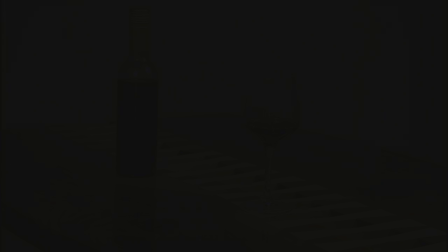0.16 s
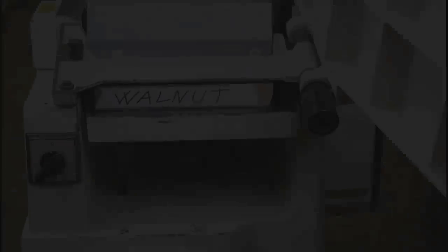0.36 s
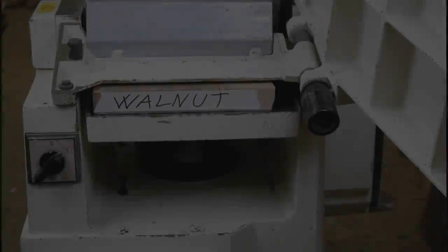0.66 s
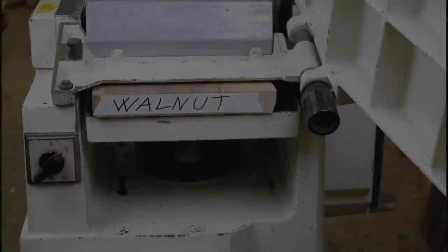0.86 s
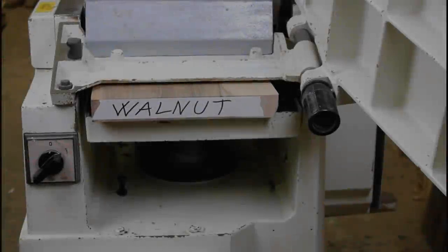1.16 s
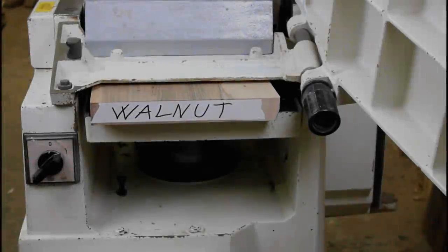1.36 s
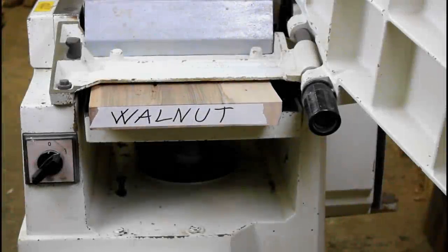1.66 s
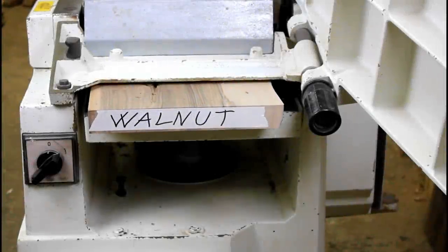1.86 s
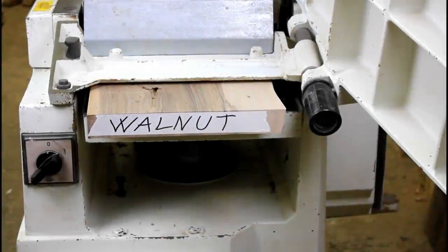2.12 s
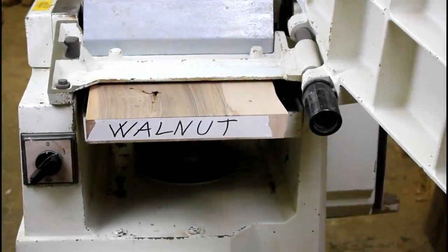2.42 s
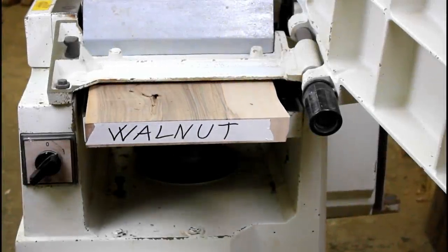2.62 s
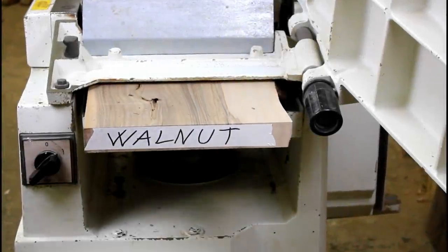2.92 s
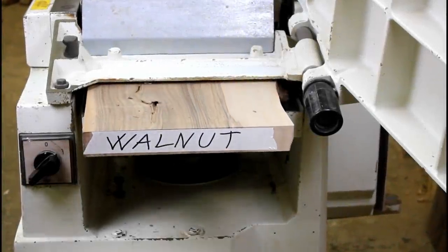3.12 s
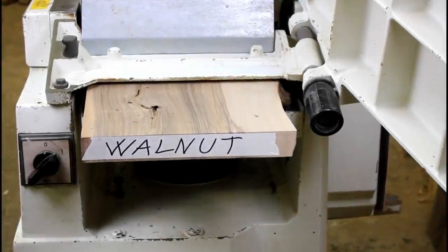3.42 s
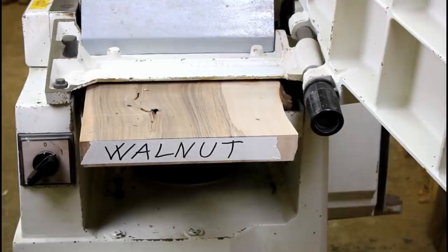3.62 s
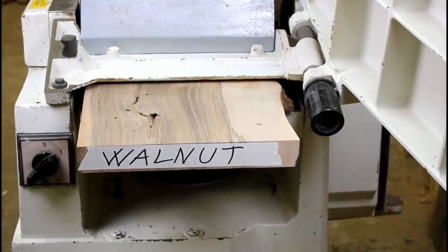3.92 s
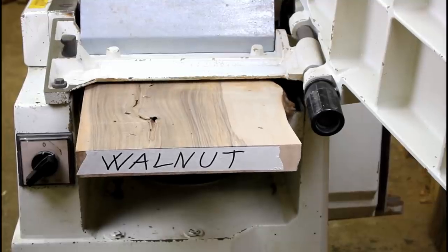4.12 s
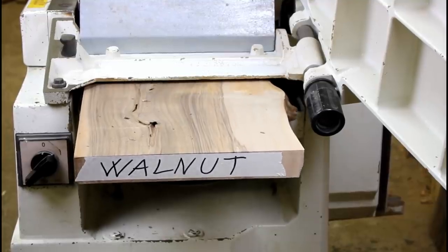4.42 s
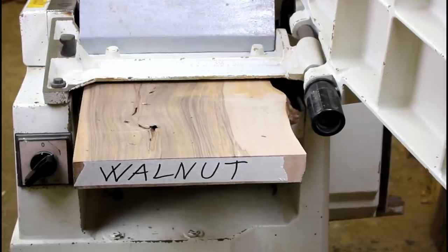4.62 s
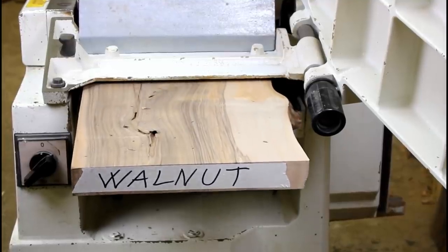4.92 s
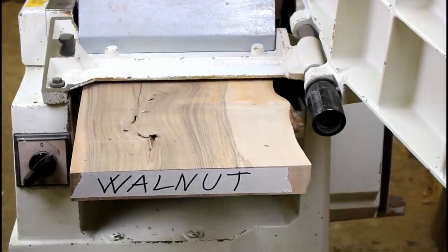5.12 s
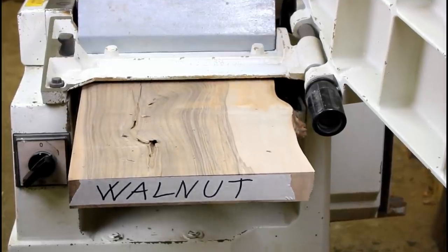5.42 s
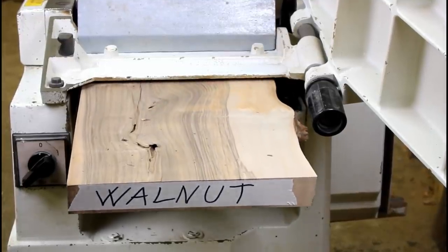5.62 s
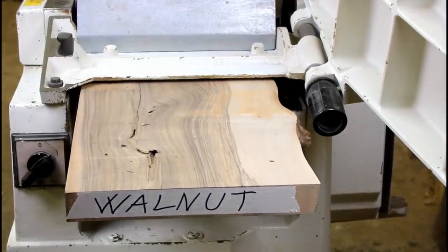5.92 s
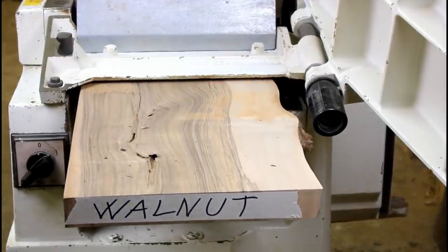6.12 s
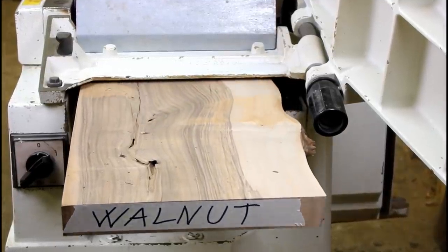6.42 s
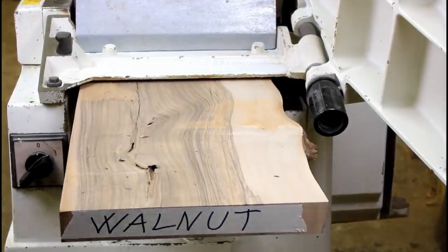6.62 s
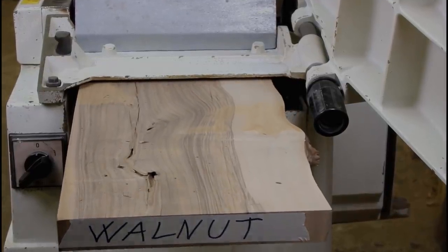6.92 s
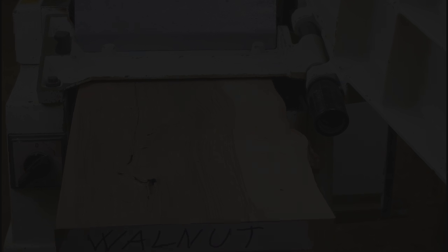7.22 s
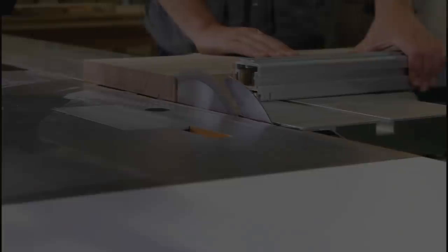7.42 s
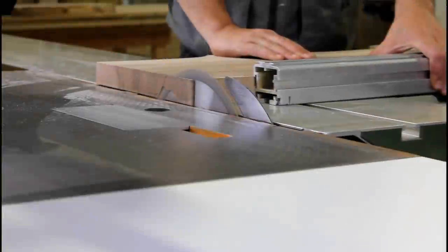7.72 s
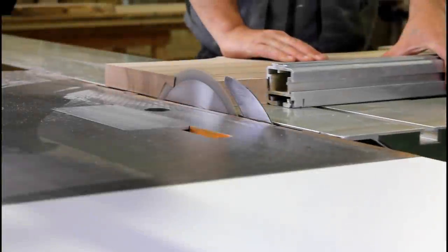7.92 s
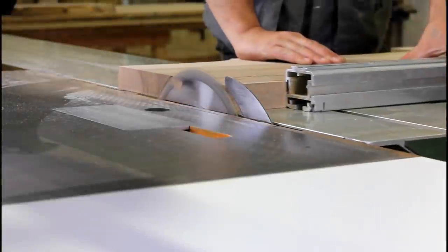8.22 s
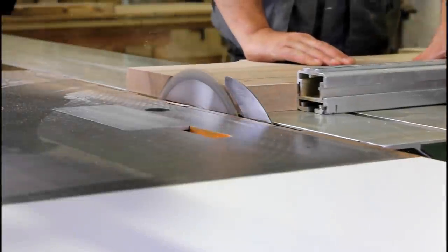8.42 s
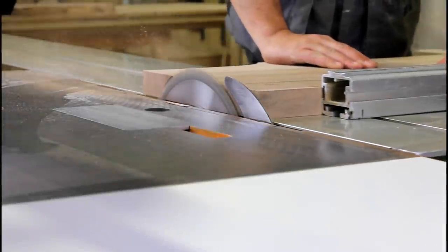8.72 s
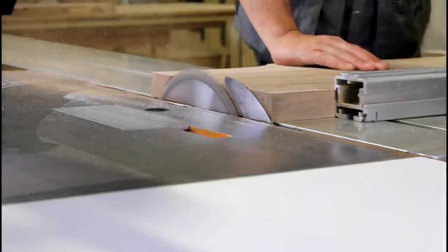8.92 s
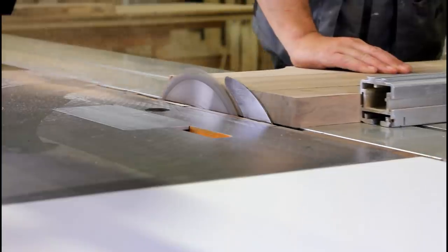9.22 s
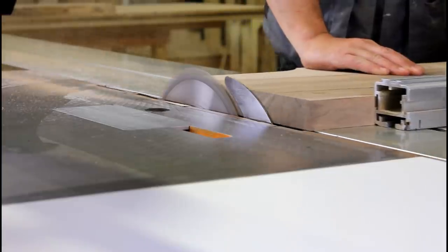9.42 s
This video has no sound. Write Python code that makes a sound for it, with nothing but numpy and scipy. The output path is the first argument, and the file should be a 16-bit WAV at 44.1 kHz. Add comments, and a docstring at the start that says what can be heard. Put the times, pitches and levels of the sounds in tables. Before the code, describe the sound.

In a dry-sounding woodworking shop, heard in mono, a planer builds up as it cuts a board: a shifting, many-toned whine with a throbbing rasp, hissing chips and a steady machine roar. It fades away completely. Right after, a table saw rips a board for the last two seconds or so, with two tiny bright scrapes, a high metallic ring from the blade and an even cutting hiss.

```python
"""A wood shop on one microphone, dry, the same in both channels.
First a thickness planer shaves a wide board: three knives on one cutterhead whine, rasp and spit chips
over the roar of the machine. It fades out to silence a little after seven seconds.
Then a table saw fades in: its teeth sing as they enter the board, and the cut swells to an even hiss."""
import sys
import numpy as np
from scipy import signal
from scipy.io import wavfile
from scipy.ndimage import uniform_filter1d

SR = 44100
rng = np.random.default_rng(int(sys.argv[2]) if len(sys.argv) > 2 else 0)


def bounce(signal):
    """Save signal as a 16-bit WAV file at the path given by the first command-line argument."""
    frames = np.transpose(np.atleast_2d(signal))
    limited = np.clip(frames, -1, 1)
    pcm = np.round(limited * 32767).astype(np.int16)
    wavfile.write(sys.argv[1], SR, pcm)


N = 421596
HOP = 256  # samples between updates of slow levels
CHANGE_S = 7.257  # the silence between planer and saw
KNIVES, TEETH = 3, 96

# planer balance: t/s, then relative level/dB of whine, chips, rasp, body drone
PLANER_LEVELS = [(0.0, -54.5, -63, -60, -53), (0.1, -51, -58.5, -55.5, -49.5), (0.55, -48, -57.5, -51, -48),
                 (0.9, -50, -57, -53, -48.5), (1.1, -45.5, -53.5, -50, -45.5), (1.4, -44, -53, -51, -44.5),
                 (1.46, -44, -52.5, -53, -46), (1.52, -41.5, -54, -48, -47),
                 (1.68, -40, -55.5, -48.5, -48.5), (1.8, -42.5, -58, -51.5, -48),
                 (2.1, -40, -56, -49.5, -45.5), (2.26, -40.5, -54, -49.5, -45.5),
                 (2.57, -37, -49, -47.5, -43.5), (2.89, -37.5, -52.5, -48, -45), (3.05, -34, -47, -46, -43),
                 (3.58, -34, -48, -44, -41), (4.0, -35, -50.5, -45, -40), (4.5, -37, -54.5, -47, -44.5),
                 (4.73, -37.5, -47, -47, -42.5), (4.97, -35.5, -46, -44.5, -43.5),
                 (5.45, -36.5, -46.5, -45.5, -39), (6.0, -36, -49, -42.5, -43), (6.3, -39, -50, -47, -45),
                 (6.6, -38, -48.5, -45, -46), (7.05, -38, -49, -41, -46)]
# saw balance: t/s, then relative level/dB of rumble, cutting hiss, sizzle, plate ring
SAW_LEVELS = [(7.3, -48, -41, -55, -49.5), (7.45, -49, -49, -55, -46), (7.57, -47.5, -38, -52, -54),
              (7.705, -41.5, -34, -50, -44.5), (7.725, -48, -39.5, -51, -51.5),
              (7.9, -43.5, -37.5, -51, -46), (8.1, -43, -37.5, -50, -42.5),
              (8.25, -41.5, -37.5, -47, -38.5), (8.4, -40.5, -38.5, -46, -37.5),
              (8.52, -40.5, -35.5, -42.5, -37.5), (8.6, -40.5, -39, -45.5, -36),
              (8.82, -42.5, -40.5, -45, -34), (9.07, -42, -38.5, -46.5, -37.5),
              (9.16, -41, -36.5, -47, -39.5), (9.28, -40.5, -36.5, -46.5, -37.5),
              (9.45, -43, -35, -48.5, -40.5), (9.56, -40, -35.5, -46, -38)]


def planer():
    """Knives strike the board on every turn; the cutterhead slows as the cut widens."""
    # cutterhead speed: t/s, turn rate/Hz
    speed = [(0.0, 72.4), (0.38, 71.96), (1.56, 71.72), (1.96, 71.2), (2.93, 71.67), (4.39, 71.04),
             (4.67, 71.6), (4.97, 70.8), (5.37, 70.96), (5.94, 70.44), (6.26, 70.5), (7.2, 70.74)]
    at, t, hops = span(0, CHANGE_S)
    hz = curves(speed, t)[0]
    turns = np.cumsum(hz) / SR
    knife = (KNIVES * turns).astype(int)
    knife_db = np.array([0, -8, -10])  # one knife stands proud of the others
    blows = amp(knife_db[knife % KNIVES]) * np.exp(-(KNIVES * turns % 1) / 2.3)
    belt = 1 + .07 * np.cos(2 * np.pi * 17.5 * t)  # the drive belt makes rasp and chips throb
    whine = knife_whine(t, hops, turns, hz.mean())
    rasp = knife_rasp(t, hops, turns, hz.mean(), blows)
    return at, whine + belt * (rasp + chip_spray(t, knife, blows)) + planer_roar(t)


def knife_whine(t, hops, turns, mean_hz):
    """Repeating blows make a stack of orders whose balance shifts as the board slides out."""
    # orders with the board's free end short, half out and long: multiple, relative level/dB
    short_board = [(1, -33), (2, -29.5), (3, -21), (4, -17), (5, -19.5), (6, -8.5), (7, -24), (8, -23),
                   (9, -8.5), (10, -15.5), (11, -14), (12, -6), (13, -25), (14, -10.5), (15, 0), (16, -19),
                   (17, -2.5), (18, -8), (19, -8), (20, -10), (21, -9), (22, -14), (23, -5), (24, -4),
                   (25, -15), (26, -9), (27, -5.5), (28, -13), (29, -12.5), (30, -5.5), (31, -29),
                   (32, -19), (33, -11), (34, -7), (35, -23.5), (36, -11), (37, -6), (38, -8), (39, -33),
                   (40, -15), (41, -10), (42, -14), (43, -12), (44, -5), (45, -15.5), (46, -10.5),
                   (47, -31), (48, -24)]
    half_board = [(1, -32.5), (2, -29.5), (3, -20), (4, -18.5), (5, -17), (6, -8.5), (7, -27.5), (8, -16),
                  (9, -10), (10, -23), (11, -20.5), (12, -12), (13, -11), (14, -13), (15, 0), (16, -18.5),
                  (17, -12.5), (18, -3), (19, -20), (20, -12.5), (21, -12), (22, -19.5), (23, -1), (24, -4),
                  (25, -16.5), (26, -23), (27, -12.5), (28, -13), (29, -14.5), (30, -12), (31, -18),
                  (32, -19.5), (33, -17), (34, -37), (35, -13.5), (36, -14), (37, -39), (38, -19),
                  (39, -18), (40, -17.5), (41, -16.5), (42, -24), (43, -16.5), (44, -24), (45, -23.5),
                  (46, -80), (47, -20.5), (48, -21)]
    long_board = [(1, -35.5), (2, -30), (3, -12), (4, -20), (5, -12.5), (6, -10.5), (7, -31), (8, -17.5),
                  (9, -21), (10, -23), (11, -16.5), (12, -3), (13, -17), (14, -7), (15, -5), (16, -24),
                  (17, -13), (18, -6), (19, -16), (20, -10.5), (21, 0), (22, -15), (23, -4), (24, -8),
                  (25, -15), (26, -9.5), (27, -20), (28, -15), (29, -15), (30, -10), (31, -26), (32, -12),
                  (33, -14), (34, -17), (35, -14), (36, -14.5), (37, -33), (38, -18), (39, -19.5),
                  (40, -26), (41, -18.5), (42, -13), (43, -26), (44, -19.5), (45, -12.5), (46, -15),
                  (47, -31), (48, -10.5)]
    # loudest orders at rest: multiple, level/dB over the whine
    loud_orders = [(3, -21.5), (12, -13.0), (15, -5.5), (18, -13), (21, -16.0), (23, -11), (24, -15.5)]
    # they swell as the grain changes: middle t/s, length/s, multiple, peak/dB over the whine
    grain_swells = [(0.0, 0.8, 12, 2), (0.27, 1.86, 15, 3.5), (0.3, 1.2, 3, -21), (0.378, 0.42, 24, -1),
                    (0.54, 1.1, 21, -2.5), (0.81, 1.66, 12, -6), (0.92, 0.32, 15, 3.5),
                    (0.96, 1.8, 18, -7.5), (1.41, 1.1, 24, 1), (1.57, 1.44, 23, -0.5), (2.06, 0.89, 3, -17),
                    (2.07, 0.67, 15, -4.5), (2.08, 1.1, 21, -4.5), (2.434, 0.15, 12, -13),
                    (2.84, 1.16, 23, -3), (2.847, 0.47, 18, -7), (2.998, 0.6, 15, -13),
                    (3.993, 2.1, 24, -4.5), (4.017, 1.74, 18, -2.5), (4.13, 0.86, 15, 0.0),
                    (4.304, 0.86, 23, 2), (4.39, 0.23, 21, -9), (4.5, 0.6, 3, -24.5), (4.7, 0.2, 12, -8),
                    (4.85, 0.25, 15, -9), (5.33, 1.1, 24, -12), (5.39, 0.32, 18, -4), (5.4, 1.2, 23, -9.0),
                    (5.58, 1.09, 3, -17.5), (5.79, 1.4, 12, -7), (6.166, 1.6, 21, 0),
                    (6.408, 0.52, 23, -5.5), (6.43, 0.17, 15, -3), (6.65, 0.35, 24, -22),
                    (6.74, 1.15, 3, -13.5), (6.846, 0.25, 15, -27), (6.98, 0.78, 12, -12),
                    (7.155, 0.16, 15, -6), (7.15, 0.85, 18, -10)]
    whine_db, _, _, body_db = curves(PLANER_LEVELS, t)
    loud_db = swollen(loud_orders, grain_swells, hops)
    stages_s = [.9, 2.6, 4.3, 5.7]
    short = np.interp(hops, stages_s, [1, 0, 0, 0])
    long = np.interp(hops, stages_s, [0, 0, 0, 1])
    k = np.transpose(short_board)[0]
    order_db = board_resonance(k * mean_hz, hops)
    for stage, share in (short_board, short), (half_board, 1 - short - long), (long_board, long):
        order_db += np.outer(np.transpose(stage)[1], share)
    quiet = ~np.isin(k, list(loud_db))
    low, upper = quiet & (k <= 9), quiet & (k > 9)  # the machine body drones on the low orders
    drone = amp(body_db + 6) * orders(turns, k[low], order_db[low], wander=.34, seconds=.26)
    whine = amp(whine_db + 1) * orders(turns, k[upper], order_db[upper], wander=.75, seconds=.2)
    loud = amp(whine_db) * orders(turns, list(loud_db), list(loud_db.values()), wander=.18, seconds=.05)
    return drone + whine + loud


def knife_rasp(t, hops, turns, mean_hz, blows):
    """Nicks in the knives repeat the same rasp at every turn."""
    # outline of the high orders: f/Hz, relative level/dB
    outline = [(3400, -18), (4200, -22.5), (5000, -23.5), (5800, -27), (7000, -32), (8500, -37.5),
               (11000, -37.5), (13600, -47)]
    k = np.arange(49, 190)
    order_db = spectrum_at(outline, k * mean_hz) + 2 * rng.standard_normal(len(k))
    order_db += 3.25 * (k % KNIVES == 0)  # orders at the knife rate stand out
    order_db = order_db[:, None] + board_resonance(k * mean_hz, hops)
    rasp = orders(turns, k, order_db, wander=1, seconds=.22)
    rasp_db = curves(PLANER_LEVELS, t)[2]
    return amp(rasp_db + 7) * unit_rms(.86 + blows) * rasp


def board_resonance(hz, hops):
    """Resonances of board and table pass as the board slides out: lift in dB by frequency and hop."""
    # resonances: middle t/s, length/s, f/Hz, width/Hz, lift/dB
    resonances = [(0.52, 0.58, 4260, 150, 6), (0.55, 0.7, 5450, 400, 6), (0.84, 0.68, 3170, 220, 3.5),
                  (1.003, 0.85, 6500, 400, 12), (1.22, 0.41, 4950, 220, 8), (1.493, 0.44, 1910, 500, 6),
                  (1.862, 0.55, 2310, 220, 12), (2.148, 1, 3198, 220, 20.5), (2.15, 0.44, 4400, 250, 7),
                  (2.21, 1.6, 1860, 220, 6), (2.738, 0.72, 3970, 220, 11), (3.312, 0.62, 2630, 220, 1),
                  (3.4, 1.2, 5606, 220, 6), (3.59, 0.78, 2230, 219, 2.5), (3.61, 0.53, 3830, 220, 5),
                  (4.31, 0.36, 5480, 220, 12.5), (4.46, 1, 3080, 220, 6), (4.718, 0.22, 3094, 300, 12),
                  (4.75, 0.24, 2000, 300, 9.5), (5.0, 0.29, 5100, 250, 10), (5.34, 0.21, 3730, 229, 8),
                  (5.35, 0.4, 5680, 250, 9), (5.768, 0.86, 5560, 220, 11), (5.845, 0.56, 2620, 220, 11.5),
                  (5.86, 1.3, 2930, 220, 4), (5.877, 0.31, 2150, 220, 5), (6.138, 0.79, 5150, 219, 12),
                  (6.28, 1.4, 3932, 220, 3), (6.553, 0.5, 6550, 250, 9), (6.897, 0.69, 2100, 200, 6),
                  (6.95, 0.75, 2750, 200, 11.5)]
    return sum(db * np.outer(bell(hz, f, width), bell(hops, middle, length))
               for middle, length, f, width, db in resonances)


def chip_spray(t, knife, blows):
    """Chips burst off each knife, every burst with its own size."""
    # chip hiss: f/Hz, relative level/dB
    spectrum = [(1470, -62), (2500, -14), (3100, -7), (4240, -10), (5590, -8.5), (6030, -9.5),
                (13400, -11.5), (15600, -15)]
    chips_db = curves(PLANER_LEVELS, t)[1]
    sizes = amp(2 * rng.standard_normal(knife[-1] + 1))
    bursts = unit_rms(.44 + blows * sizes[knife])
    return amp(chips_db + 5) * bursts * noise(spectrum, len(t), patchy_db=1)


def table_saw():
    """A toothed blade cuts the board and slowly recovers speed."""
    # teeth passing the wood: t/s, f/Hz
    tooth_rate = [(7.25, 3612), (7.6, 3605), (7.9, 3618), (8.2, 3626), (8.55, 3631), (8.8, 3643),
                  (9.1, 3641), (9.56, 3647)]
    at, t, hops = span(CHANGE_S, N / SR)
    turns = np.cumsum(curves(tooth_rate, t)[0]) / SR / TEETH
    blade = tooth_song(hops, turns) + plate_ring(t, turns)
    return at, blade + cutting_hiss(t, turns) + blade_scrapes(t) + saw_rumble(t, turns)


def tooth_song(hops, turns):
    """The teeth pass the wood as a tone; alternate bevels add half multiples."""
    # singing shaft orders at rest: multiple, level/dB
    singing_orders = [(27, -71), (48, -57.5), (96, -54), (192, -56), (288, -57), (384, -65.0)]
    # they squeal by fits: middle t/s, length/s, multiple, peak/dB
    squeals = [(7.418, 0.08, 384, -39.5), (7.42, 0.15, 96, -46), (7.502, 0.05, 192, -48.5),
               (7.529, 0.09, 288, -45), (7.532, 0.08, 384, -40), (7.639, 0.17, 48, -52.0),
               (7.643, 0.3, 96, -37.5), (7.661, 0.026, 288, -48), (7.702, 0.08, 384, -45.0),
               (7.716, 0.05, 192, -43), (7.72, 0.03, 384, -38.0), (7.742, 0.1, 288, -56.0),
               (7.825, 0.035, 96, -43.5), (7.823, 0.021, 192, -41), (7.991, 0.51, 192, -43),
               (8.002, 0.31, 384, -50), (8.026, 0.17, 96, -36.5), (8.099, 0.66, 288, -50.5),
               (8.1, 0.068, 288, -36.5), (8.14, 0.09, 384, -45.0), (8.234, 0.74, 48, -57),
               (8.266, 0.21, 96, -36.5), (8.395, 0.04, 96, -39.5), (8.466, 0.38, 27, -46.5),
               (8.591, 0.2, 192, -51.0), (8.663, 0.9, 384, -55.5), (8.744, 0.09, 96, -48.5),
               (8.754, 0.04, 192, -53), (8.81, 0.13, 27, -47), (8.894, 0.07, 96, -48),
               (8.901, 0.1, 192, -47.0), (8.944, 0.08, 288, -53), (9.065, 0.2, 96, -45),
               (9.197, 0.19, 48, -53.5), (9.241, 0.51, 27, -44.5), (9.307, 0.13, 96, -46.5),
               (9.5, 0.12, 96, -47.5), (9.548, 0.065, 27, -44)]
    level_db = swollen(singing_orders, squeals, hops)
    harmonics = TEETH * np.arange(1, 5)
    tone = orders(turns, harmonics, [level_db[k] for k in harmonics], wander=.37, seconds=.012)
    bevel_db = level_db[TEETH // 2] + np.array([[0], [-4], [-9], [-9]])
    bevels = orders(turns * TEETH / 2, [1, 3, 5, 7], bevel_db, wander=.58, seconds=.03)
    board_note = orders(turns, [27], level_db[27], wander=.5, seconds=.03)
    return tone + bevels + board_note


def plate_ring(t, turns):
    """The blade plate rings on the even shaft orders near its modes."""
    # plate modes: f/Hz, width/Hz, relative level/dB
    modes = [(4100, 500, -3), (4950, 500, 3.5), (5500, 300, -8), (5970, 330, -3.5), (6470, 300, -5),
             (7900, 300, -11), (8800, 400, -10), (10000, 500, -19), (10700, 300, -17), (11500, 400, -17)]
    k = np.arange(TEETH + 4, 320, 2)
    hz = k * turns[-1] / len(t) * SR
    response = sum(amp(db) / (1 + (2 * (hz - f) / width) ** 2) for f, width, db in modes)
    order_db = 20 * np.log10(response)[:, None] + 1.9 * rng.standard_normal((len(k), 1))
    ring = orders(turns, k, order_db, wander=1.1, seconds=.03)
    ring_db = curves(SAW_LEVELS, t)[3]
    return amp(ring_db + .98 * (ring_db - ring_db.max()) + 2.5) * unit_rms(ring)


def cutting_hiss(t, turns):
    """Fibres tear as a hiss that throbs a little with the blade."""
    # tearing fibres and the sizzle above them: f/Hz, relative level/dB
    tearing = [(470, -51), (800, -16.5), (1030, -10.5), (1510, -13.5), (1800, -5), (3200, -2.5), (3700, -2),
               (4360, -4.5), (7480, -14.5), (8000, -36), (10400, -50), (17600, -120)]
    treble = [(3240, -35), (5500, -3), (8390, -4), (10600, -3), (12700, -5.5), (14800, -8), (15600, -10.5)]
    _, cut_db, sizzle_db, ring_db = curves(SAW_LEVELS, t)
    throb = 1 + .055 * np.cos(4 * np.pi * turns) + .049 * np.cos(8 * np.pi * turns)
    hiss = amp(.6 * cut_db + .4 * ring_db + 5) * noise(tearing, len(t), patchy_db=1)
    sizzle = amp(sizzle_db + 4.5) * noise(treble, len(t), patchy_db=2.8)
    return throb * (hiss + sizzle)


def blade_scrapes(t):
    """The blade gives two short bright scrapes."""
    # scrapes: t/s, peak/dB, length/s
    scrapes = [(7.716, -34.5, 0.015), (7.832, -38, .01)]
    # their colour: f/Hz, relative level/dB
    spectrum = [(7000, -25), (9000, -13), (10900, 2), (12000, -12), (13500, -4), (14500, -3), (15800, -11)]
    envelope = sum(amp(db) * np.exp(-2 * ((t - middle) / length) ** 2) for middle, db, length in scrapes)
    return envelope * noise(spectrum, len(t), patchy_db=1)


def planer_roar(t):
    """Fan, drive and hood roar under the knives, with a hum of the shop."""
    # roar: f/Hz, relative level/dB
    spectrum = [(30, -28), (60, -14), (110, -12), (220, -5), (400, -1), (600, -4), (850, -3), (1200, 0),
                (1700, 0), (2200, -2), (2800, -3), (3600, -6), (4800, -11), (8000, -22), (10000, -50)]
    whine_db, _, rasp_db, body_db = curves(PLANER_LEVELS, t)
    roar = amp(.5 * rasp_db + .2 * whine_db + .3 * body_db - 2.8) * noise(spectrum, len(t), patchy_db=1)
    hum = amp(body_db - body_db.max()) * orders(t, [296], -56, wander=.28, seconds=.05)
    return roar + hum


def saw_rumble(t, turns):
    """Under the cut lie a rumble, the shaft's orders, the motor's steady drone and a hum of the shop."""
    # low orders of the blade shaft: multiple, relative level/dB
    shaft_orders = [(1, -37), (2, -11), (3, -34.5), (4, -13.5), (5, -5.5), (6, -9), (7, -12.5), (8, -14.5),
                    (9, -28), (10, -11), (11, -6), (12, -8), (13, -14), (14, -32), (15, -21), (16, -1.5),
                    (17, -12), (18, -18), (19, -8.5), (20, -13.5), (21, -11), (22, -19), (23, -23),
                    (24, -15), (25, -12), (26, -5.5), (27, 1), (28, -8), (29, -4), (30, -4), (31, -6),
                    (32, -24), (33, -2.5), (34, -7), (35, -8), (36, -9), (37, -16), (38, -12), (39, -6),
                    (40, -8)]
    # rumble and motor drone: f/Hz, relative level/dB
    spectrum = [(15, -61), (25, -35), (178, -2), (261, -9.5), (292, -3.5), (326, -3), (596, -3), (860, -9),
                (996, -14), (1520, -9), (2000, -7), (2600, -20), (4400, -120)]
    drone = [(30, -25), (60, -4), (110, -7), (170, 4), (260, -12), (500, -40)]
    rumble_db = curves(SAW_LEVELS, t)[0]
    rumble = amp(rumble_db - 4) * noise(spectrum, len(t), patchy_db=.5)
    k, db = np.transpose([row for row in shaft_orders if row[0] != 27])  # 27 sings in tooth_song
    shaft_db = rumble_db + .92 * (rumble_db - rumble_db.max()) - 8.5
    shaft = amp(shaft_db) * orders(turns, k, db[:, None], wander=.61, seconds=.1)
    motor = amp(-59) * noise(drone, len(t), patchy_db=1.5)
    hum = amp(rumble_db - np.median(rumble_db)) * orders(t, [295.8], -51, wander=.14, seconds=.05)
    return rumble + shaft + motor + hum


def orders(turns, multiples, levels_db, wander, seconds):
    """Cosines on multiples of a shaft, drifting in size and phase; levels_db is by multiple and hop."""
    n = len(turns)
    drift = (1 + wander * slow_drift(n, seconds, len(multiples))) / np.sqrt(1 + wander ** 2)
    sizes = amp(levels_db) * abs(drift)
    phases = np.unwrap(np.angle(drift)) + rng.uniform(0, 2 * np.pi, (len(multiples), 1))
    return np.sqrt(2) * sum(per_sample(size, n) * np.cos(2 * np.pi * k * turns + per_sample(phase, n))
                            for k, size, phase in zip(multiples, sizes, phases))


def noise(spectrum, length, patchy_db):
    """Coloured noise of rms 1 with drifting louder and softer patches."""
    hz = np.fft.rfftfreq(4 * HOP, 1 / SR)
    real, imag, patches = rng.standard_normal((length // HOP + 5, len(hz), 3)).T
    patches = unit_rms(uniform_filter1d(uniform_filter1d(patches, 14, axis=0), 12, axis=1))
    frames = (real + 1j * imag) * amp(spectrum_at(spectrum, hz)[:, None] + patchy_db * patches)
    return unit_rms(signal.istft(frames, nperseg=4 * HOP, noverlap=3 * HOP)[1][:length])


def slow_drift(length, seconds, count):
    """Complex random rows of rms 1 that change over the given seconds, one value a hop."""
    z = rng.standard_normal((count, length // HOP + 2, 2)) @ [1, 1j]
    width = max(round(seconds * SR / HOP), 1)
    smooth = lambda v: uniform_filter1d(uniform_filter1d(v, width, axis=1), width, axis=1)
    return unit_rms(smooth(z.real) + 1j * smooth(z.imag))


def swollen(rest, swells, t):
    """Each multiple's level in dB: its rest level with bell-shaped swells on top."""
    sizes = {k: amp(db) for k, db in rest}
    for middle, length, k, peak_db in swells:
        sizes[k] = sizes[k] + amp(peak_db) * bell(t, middle, length)
    return {k: 20 * np.log10(size) for k, size in sizes.items()}


def span(start_s, end_s):
    """Samples of a stretch, their times, and the times of its hops."""
    at = np.arange(round(start_s * SR), min(round(end_s * SR), N))
    return at, at / SR, start_s + np.arange(len(at) // HOP + 2) * HOP / SR


def spectrum_at(points, hz):
    """A spectrum's level at hz, interpolated on a log axis."""
    f, db = np.transpose(points)
    return np.interp(np.log(hz + 1), np.log(f + 1), db)


def curves(rows, t):
    """Every value column of a table at the times t."""
    times, *columns = np.transpose(rows)
    return [np.interp(t, times, column) for column in columns]


def per_sample(row, length):
    return np.interp(np.arange(length) / HOP, np.arange(len(row)), row)


def bell(x, middle, width):
    return np.exp(-(2 * (x - middle) / width) ** 2)


def amp(db):
    return 10 ** (np.asarray(db) / 20)


def unit_rms(x):
    return x / np.sqrt(np.mean(abs(x) ** 2) + 1e-20)


def scene():
    """The planer fades out and the saw fades in, in straight lines through silence."""
    fade_out_s, fade_in_s = .93, .19
    mix, t = np.zeros(N), np.arange(N) / SR
    for at, sound in (planer(), table_saw()):
        mix[at] += sound
    fade = np.clip(np.maximum((CHANGE_S - t) / fade_out_s, (t - CHANGE_S) / fade_in_s), 0, 1)
    return np.array([mix, mix]) * fade


def record(dry):
    """The microphone drops the deepest bass; a steep low-pass takes off the top."""
    low_hz, top_hz = 55, 15740
    thin = signal.sosfilt(signal.butter(2, low_hz, "high", fs=SR, output="sos"), dry)
    lowpass = signal.firwin(2047, top_hz, window=("kaiser", 9), fs=SR)
    return signal.oaconvolve(thin, lowpass[None], "same")


dry = scene()
out = record(dry)
bounce(out)
```